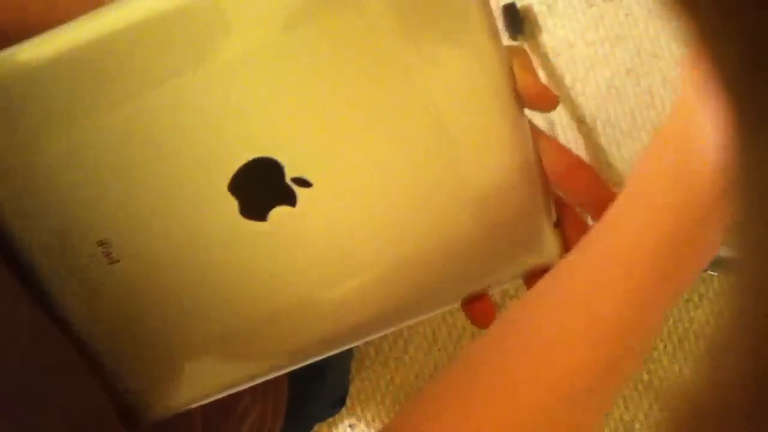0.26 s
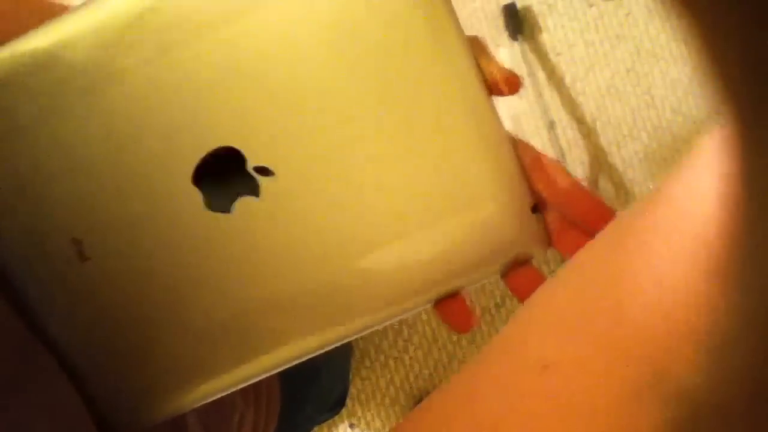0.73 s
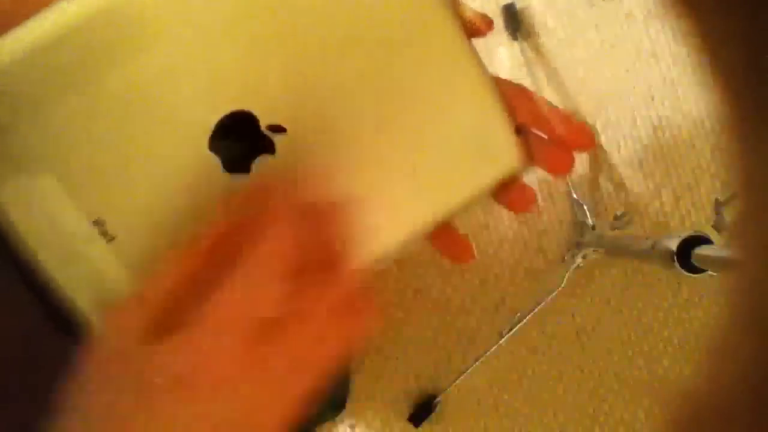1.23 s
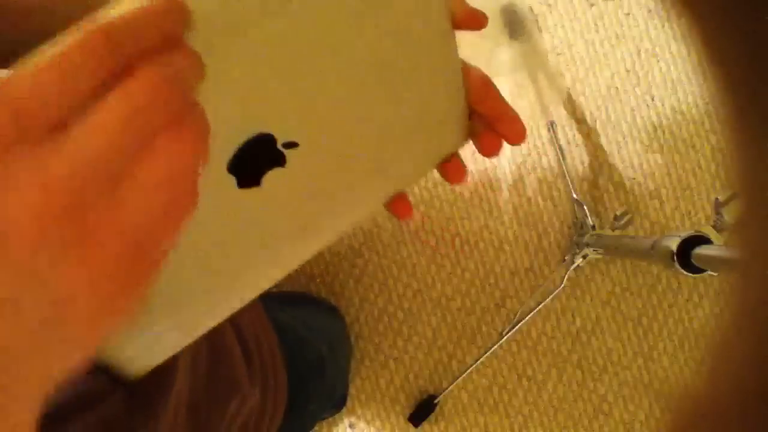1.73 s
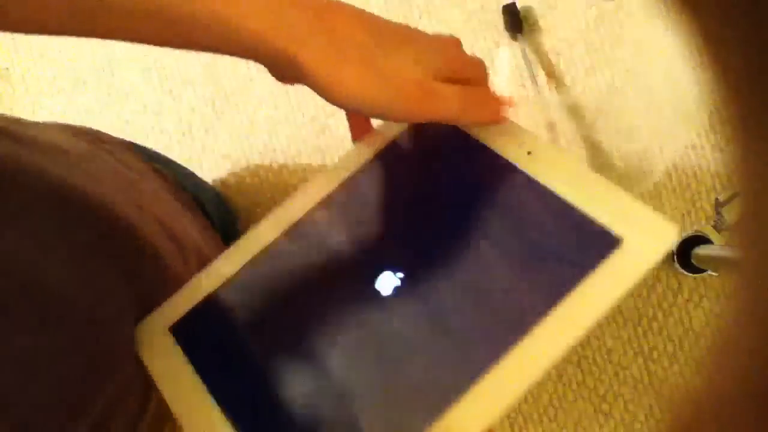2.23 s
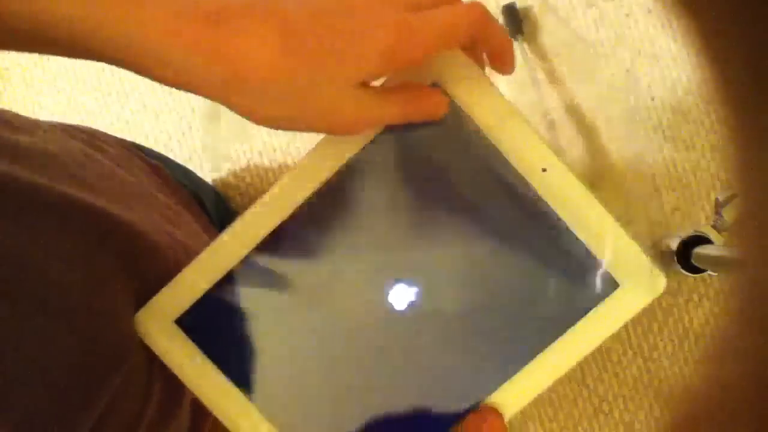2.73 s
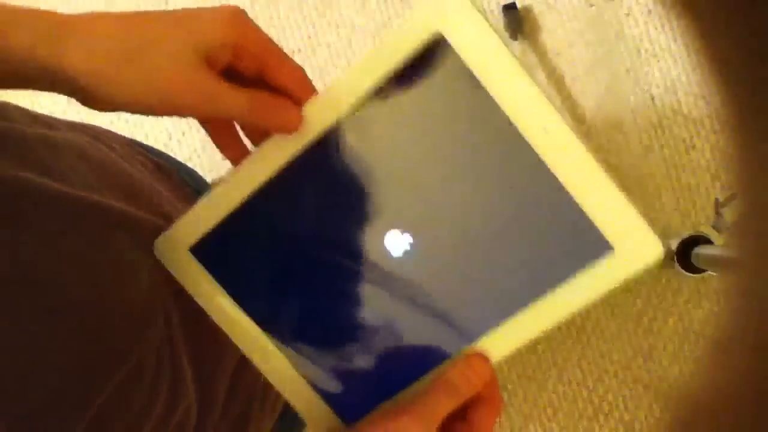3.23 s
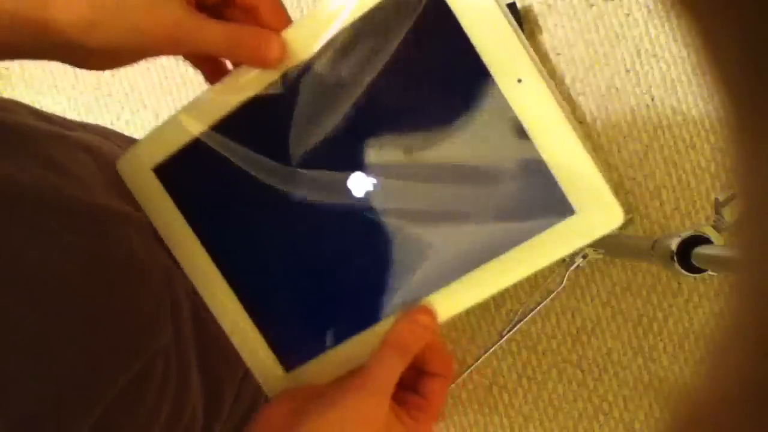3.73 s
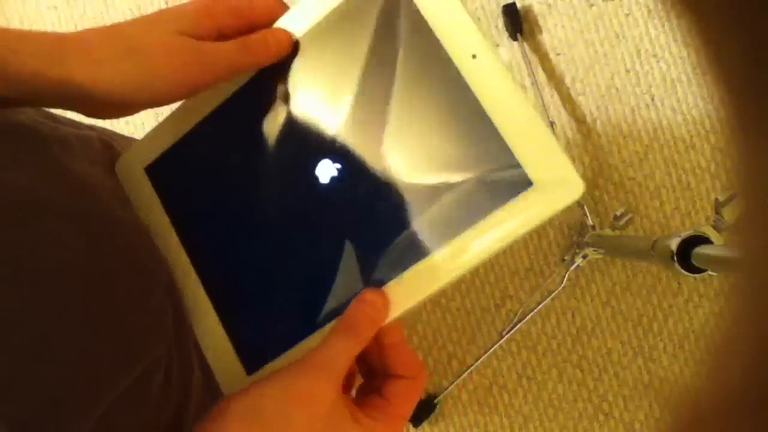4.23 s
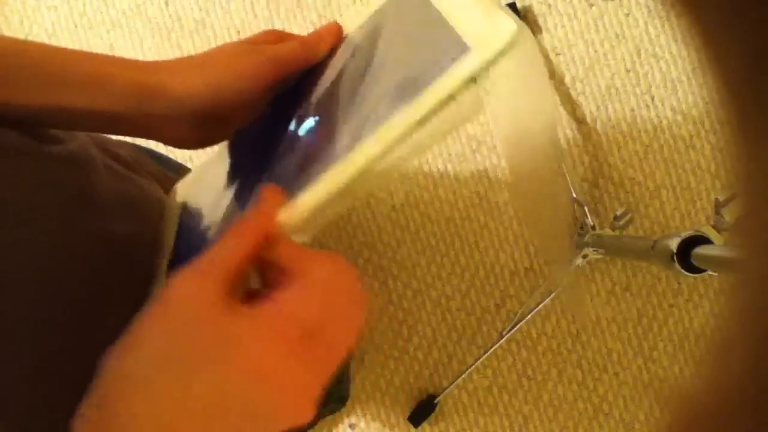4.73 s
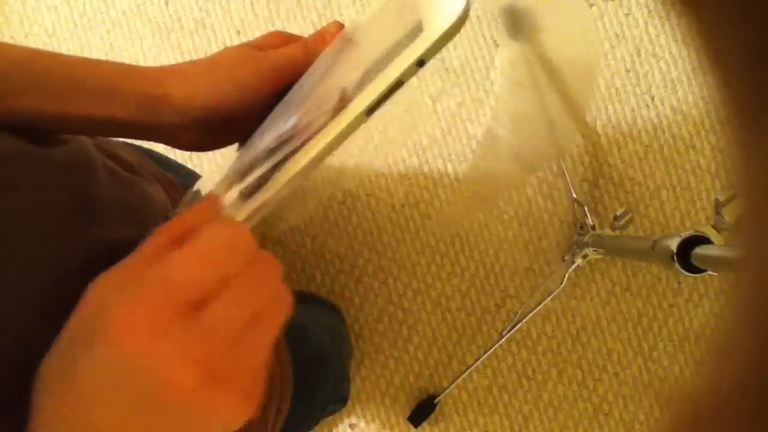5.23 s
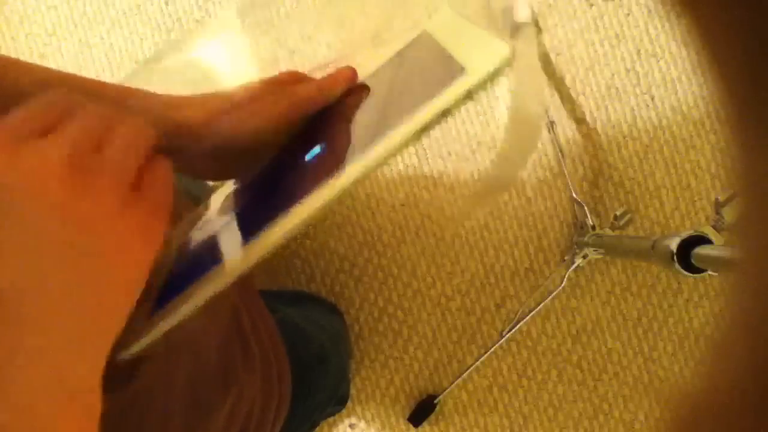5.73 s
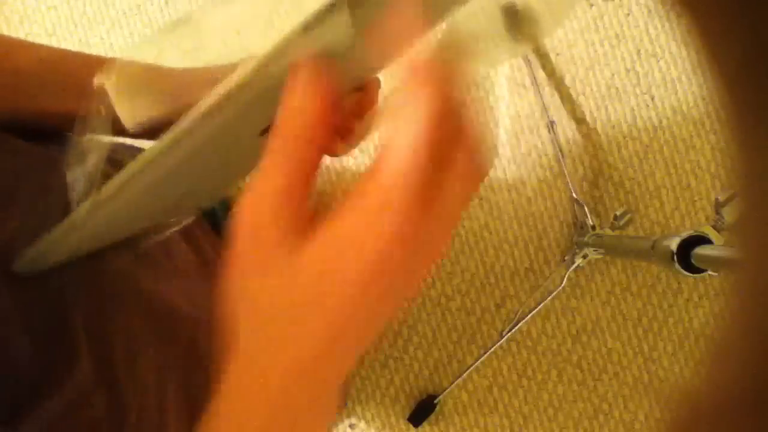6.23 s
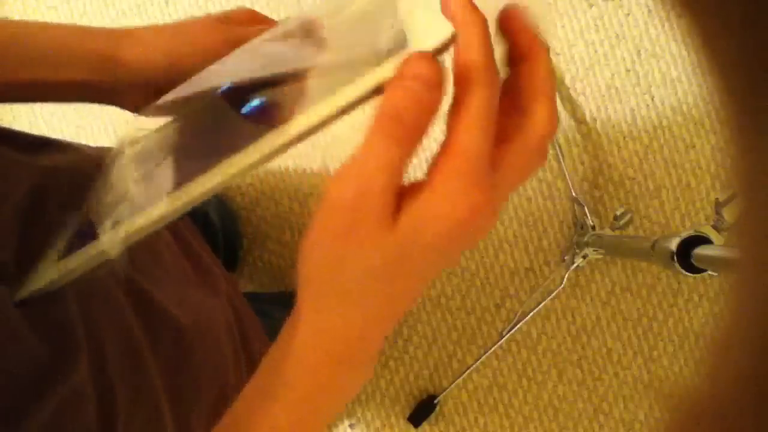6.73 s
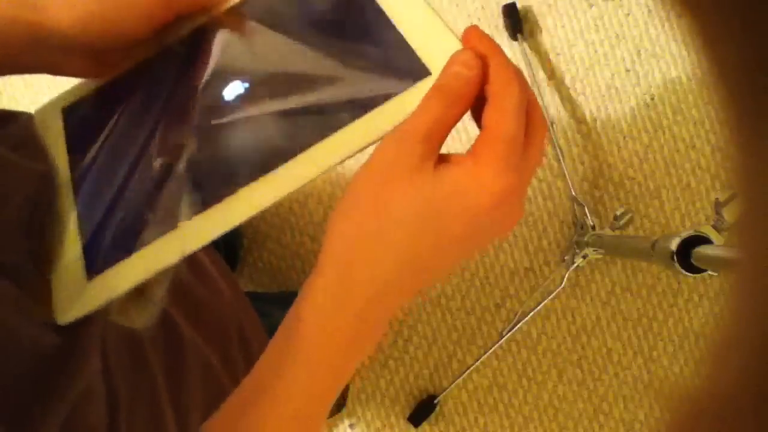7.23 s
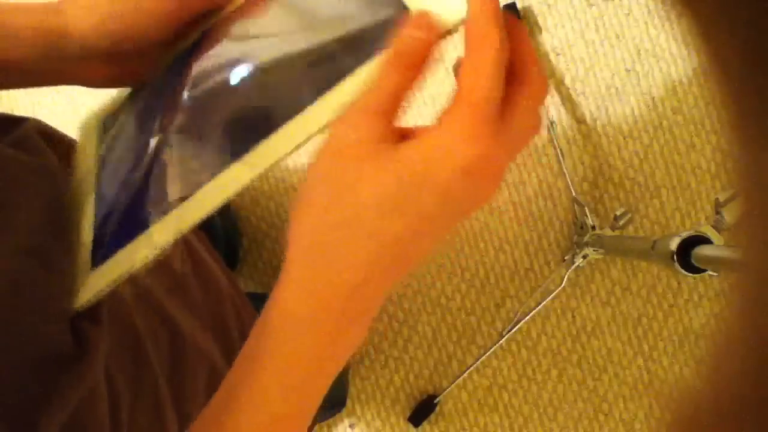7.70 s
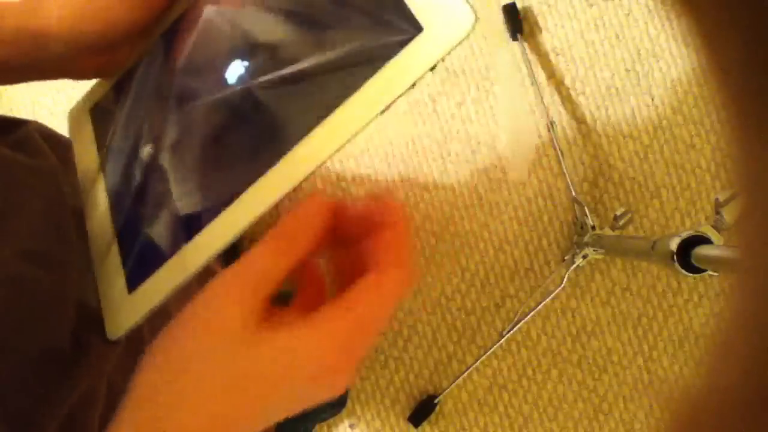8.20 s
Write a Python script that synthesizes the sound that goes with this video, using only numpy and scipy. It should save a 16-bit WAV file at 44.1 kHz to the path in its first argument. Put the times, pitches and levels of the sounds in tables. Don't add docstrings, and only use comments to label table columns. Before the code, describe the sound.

Thin stiff plastic film peeled off a flat slab up close, sharp irregular snaps and fine crackles with soft finger bumps in a quiet room.

```python
import sys
import numpy as np
from scipy import signal
from scipy.fft import rfft, irfft
from scipy.io import wavfile

SR = 44100
rng = np.random.default_rng(int(sys.argv[2]) if len(sys.argv) > 2 else 0)


def pcm_store(signal):
    levels = np.round(np.clip(np.atleast_2d(signal), -1, 1) * 32767)
    wavfile.write(sys.argv[1], SR, levels.astype(np.int16).T)


def gain_from_decibels(decibels):
    exponent = np.asarray(decibels, float) / 20
    return 10 ** exponent


N = 373086


def rms_one(x):
    return x / np.sqrt(np.mean(x ** 2) + 1e-20)


def top_one(shapes):
    return shapes / np.abs(shapes).max(axis=1, keepdims=True)


def band(x, low_hz, high_hz):
    edges_hz = [low_hz, min(high_hz, 0.45 * SR)]
    return signal.sosfilt(signal.butter(2, edges_hz, "band", fs=SR, output="sos"), x)


def at_hz(points, hz):
    points = np.array(points)
    return np.interp(np.log(hz + 1), np.log(points[:, 0]), points[:, 1])


def colour(x, spectrum):
    hz = np.fft.rfftfreq(len(x), 1 / SR)
    return rms_one(irfft(rfft(x) * gain_from_decibels(at_hz(spectrum, hz)), len(x)))


def drift(per_s):
    knots = rng.standard_normal(400)
    return np.interp(np.arange(N) / SR * per_s, np.arange(len(knots)), knots)


def place(times, shapes):
    out = np.zeros(N + shapes.shape[1])
    at = (np.asarray(times) * SR).astype(int)[:, None] + np.arange(shapes.shape[1])
    np.add.at(out, at, shapes)
    return out[:N]


def burst(t, rise_s, t60):
    return top_one((1 - np.exp(-t / rise_s)) ** 2 * gain_from_decibels(-60 * t / t60))


def gesture(t, crest_s, level_db, swell_s, fade_s):
    return gain_from_decibels(level_db - 20 * np.maximum((crest_s - t) / swell_s, (t - crest_s) / fade_s))


def creases():
    # start_s, peak_db, ring_hz (pitch), body_db
    # (below 2.2 kHz), edge_db (above 7 kHz)
    crease_flips = [(0.0037, -9.5, 4270, -21, -4.5), (0.0041, -13, 2660, -20, -24),
                    (0.0892, -32.5, 2410, -5.5, -25), (0.1773, -30.5, 3700, -14, -8),
                    (0.1951, -8, 4040, -36, -5), (0.1999, -9, 3320, -40, -4), (0.2112, -15.5, 5150, -20, -26),
                    (0.2139, -28, 3150, -27, -23), (0.3649, -7.5, 4800, -38, -3.5),
                    (0.5111, -3, 4850, -36, -9.5), (0.5146, -12, 5000, -50, -11),
                    (0.5478, -11, 4730, -32, -1), (0.5518, -8.5, 4400, -25, -5),
                    (0.5601, -13, 4120, -30, -31), (0.5627, -15.5, 4830, -21, -28),
                    (0.5992, -19, 3640, -23, -31), (0.6375, -25, 2670, -14, -25),
                    (0.6429, -19, 2410, -25, -14), (0.647, -26, 4000, -25, -18),
                    (0.6524, -30, 2780, -11, -28), (0.8102, -26, 4170, -23, -14),
                    (1.1557, -47.5, 1270, 0, -23), (1.6249, -15, 2840, -20.5, -23.5),
                    (1.7856, -26, 5300, -43, -14), (1.8521, -30, 4670, -17.5, -14),
                    (2.0177, -14, 3230, -21.5, -17), (2.0536, -30, 5210, -11, -26),
                    (2.0809, -8.5, 4530, -22, -14.5), (2.1559, -38, 5600, -17, 1),
                    (2.1713, -24, 5000, -18, -7), (2.2384, -15.5, 2760, -31, -13),
                    (2.2401, -8, 4660, -47, -11.5), (2.246, -27, 3920, -31, -9),
                    (2.2618, -3, 4450, -25, -7.5), (2.2922, -26.5, 4780, -24, -1),
                    (2.3136, -30, 4000, -30, -5), (2.4444, -24, 4830, -21.5, -11),
                    (2.6966, -29.5, 3900, -15, -22), (2.8975, -17, 4330, -38.5, -11.5),
                  (2.9096, -23.5, 5270, -15, -21), (2.912, -19.5, 4700, -13, -31),
                  (2.925, -14.5, 3370, -16, -43), (2.9866, -19, 3750, -19, -18),
                  (2.9936, -28, 3620, -19, -22), (3.141, -31, 4600, -30, -18),
                  (3.1691, -21, 2670, -12, -17), (3.1803, -22, 5060, -17, -10),
                  (3.4825, -34, 3920, -31, -23), (3.53, -41, 5000, -27, -9),
                  (3.5686, -19.5, 1570, -9.5, -7), (3.5895, -33, 3920, -28, -6),
                  (3.605, -14, 4930, -46, -10.5), (3.6125, -14.5, 4970, -48, -3),
                  (3.6281, -5.5, 4800, -46, -20), (3.6335, -24, 4690, -26, -17),
                  (3.6543, -11, 4840, -43, -7.5), (3.6592, -28, 4940, -36, 2), (3.662, -14, 4600, -26, -22),
                  (3.6797, -27, 4480, -44, -23), (3.6979, -22, 4900, -52, -3),
                  (3.763, -38.5, 3230, -27, -30), (3.831, -8, 4120, -52, -5), (3.8362, -1, 5700, -54, -22),
                  (3.843, -32, 5170, -47, -19), (3.85, -12, 4650, -43, -25), (3.8538, -15, 4960, -43, -22),
                  (3.868, -21.5, 4610, -31.5, -20), (3.9248, -31, 3920, -26, -7),
                    (4.1915, -38, 3490, -16, -16), (4.213, -30, 4400, -23, -21),
                  (4.2395, -36, 4910, -25, -11), (4.2606, -32, 3530, -22, -19),
                  (4.2722, -35, 4870, -22, -7), (4.2818, -33, 3620, -20, -11),
                  (4.2843, -40.5, 3300, -20, -26), (4.3532, -35, 4870, -21, -9),
                  (4.435, -28, 4130, -17, -14), (4.4575, -34, 4950, -22, -6), (4.4638, -35, 3010, -14, -8),
                  (4.474, -16.5, 4150, -33, -11.5), (4.4966, -31.5, 4300, -17, -4),
                  (4.5557, -4.5, 4960, -50, -15.5), (4.605, -11.5, 5270, -43, -7),
                  (4.6083, -27, 5000, -36, -7), (4.6161, -5.5, 4706, -46, -7.5),
                  (4.6218, -18, 3560, -27, -7), (4.6329, -15.5, 4400, -28, -23),
                  (4.6726, -13, 4220, -35, -17), (4.6777, -34, 4690, -28, -40),
                  (4.6895, -5.5, 4780, -54, -18), (4.6925, -20.5, 4640, -41, -4.5),
                  (4.6945, -18, 4780, -46, -24), (4.939, -19, 5650, -57, -1), (4.946, -26, 5770, -46, -4),
                  (5.1283, -22, 5100, -27, -14), (5.177, -31, 3960, -22, -33),
                  (5.1815, -21, 4470, -22, -39), (5.216, -5.5, 4220, -26.5, -13.5),
                  (5.2303, -25, 3920, -42, -35), (5.2698, -21, 4850, -22, 1.5),
                  (5.2741, -22.5, 4480, -33, -4), (5.3092, -24, 3660, -33, -40),
                  (5.3187, -4.5, 3930, -19, -4.5), (5.3245, -10, 3170, -27, -10),
                  (5.3332, -12, 4900, -34, -7), (5.368, -3.5, 5000, -28, -19),
                  (5.373, -12.5, 2820, -25, -14), (5.3783, -18, 6240, -21, -16),
                    (5.3815, -19, 4500, -33, -13), (5.3899, -13.5, 4570, -24, -9),
                  (5.401, -19, 3060, -21, -6), (5.4142, -20, 3360, -29, -4), (5.441, -28, 5210, -18, -19),
                  (5.443, -16, 4000, -30, -8), (5.458, -11.5, 4050, -30, -16),
                  (5.461, -10.5, 4170, -28, -14), (5.4653, -16.5, 4690, -27, -20),
                  (5.483, -17.5, 3620, -20, -15), (5.5139, -23, 3200, -20, -17),
                  (5.519, -6.5, 4330, -25.5, -24), (5.5357, -10.5, 3960, -22, -13),
                  (5.6035, -31.5, 3920, -16, -15), (5.6513, -24, 2410, -15, -29),
                  (5.7145, -23, 3960, -21, -35), (5.727, -25.5, 1940, -11.5, -12),
                  (5.737, -23.5, 4140, -13.5, -30), (5.7711, -32, 3660, -23, 0),
                  (5.79, -32, 1220, -5.5, -17), (5.81, -22.5, 3340, -20, -17),
                  (5.8989, -24, 2900, -28, -17), (5.9337, -27, 3140, -13, -8),
                  (5.9587, -22, 2900, -22, -40), (5.9674, -20, 4500, -25, -11), (6.034, -26, 3280, -17, -6),
                  (6.2022, -27.5, 5650, -26, -14), (6.2532, -29, 5760, -44, -16),
                  (6.311, -34.5, 4740, -15, -27), (6.346, -9, 4220, -25.5, -16),
                  (6.35, -6.5, 4280, -41, -10.5), (6.3556, -22, 3100, -23, -19),
                  (6.3599, -28, 4610, -41, -16), (6.3803, -7, 4600, -48, -25), (6.44, -22, 4550, -20, -26),
                  (6.4854, -29.5, 5400, -15, -12), (6.5693, -27, 2730, -26, -18),
                  (6.8161, -16.5, 5230, -27, -16), (6.847, -23, 4370, -29, -13),
                    (6.879, -27.5, 4480, -17, -31), (6.899, -32, 4520, -20, -13),
                    (6.933, -33.5, 3620, -29, -9), (7.033, -22, 3940, -23, -16),
                    (7.0554, -21, 3800, -22, -27), (7.062, -20, 3830, -12.5, -8.5),
                    (7.0658, -27, 3700, -18, -17), (7.091, -26, 3960, -27, -9),
                    (7.1074, -12.5, 4970, -28, -14.5), (7.139, -6.5, 4920, -27.5, -18),
                    (7.1745, -22.5, 3750, -14, -30), (7.1771, -19.5, 4260, -28, -30),
                    (7.223, -32, 4600, -32, -6), (7.2466, -33, 4540, -40, -12),
                    (7.318, -19.5, 4320, -33, -6.5), (7.3772, -18, 5000, -36, -14),
                    (7.3982, -28, 5130, -30, -18), (7.414, -27, 3060, -28, -16),
                    (7.4219, -22, 3640, -17.5, -14), (7.4333, -19.5, 4020, -21, -10),
                    (7.446, -29, 4100, -33, 3), (7.4811, -25.5, 3860, -30, -32),
                    (7.5218, -32.5, 4780, -19, -24), (7.5798, -31, 4100, -12, -11),
                    (7.6063, -15, 4280, -33, -16), (7.7047, -27, 4230, -29, -10),
                    (7.7526, -28, 3320, -26, -14), (7.9788, -23.5, 4700, -18, -30),
                    (8.0097, -15.5, 3870, -55, -15), (8.012, -20, 5300, -44, -12),
                    (8.0232, -26.5, 3750, -47, -29), (8.0598, -21.5, 3250, -15.5, -25),
                    (8.123, -4.5, 3750, -50, -34), (8.136, -23, 4200, -45, -42),
                    (8.2511, -32, 3200, -46, -2), (8.3478, -35, 3760, -17.5, -41),
                    (1.0673, -40.5, 5000, -18, -29), (1.9124, -55.5, 4350, -22, 6), (2.889, -28, 5000, -23, -11),
              (3.028, -30, 3300, -16, -26), (3.3162, -39.5, 5000, -19, -5.5),
              (3.8158, -30.5, 3400, -35, -25), (5.9055, -26, 3080, -19, -26),
              (6.0406, -29, 2100, -8.5, -25), (6.6199, -34.5, 4050, -13, -29),
              (6.7968, -32, 3450, -23, -13), (7.3541, -42.5, 4300, -37, -2), (8.1956, -45, 1800, -11, -30),
              (8.313, -46.5, 1500, -7, -27)]
    rows = np.array(crease_flips)
    lag_s, peak_boost_db, body_boost_db, edge_boost_db = 0.0006, 1.5, 12.5, 4.5
    return rows + [lag_s, peak_boost_db, 0, body_boost_db, edge_boost_db]


def snaps(flips):
    start_s, peak_db, hz, body_db, edge_db = np.transpose(flips)[:, :, None]
    t = np.arange(512)[None] / SR
    luck = rng.random((len(start_s), 2))
    noise = rng.standard_normal((len(start_s), t.size))

    ring = np.sin(2 * np.pi * (np.maximum(hz, 2600) * t + luck[:, :1])) * burst(t, 0.000098, 10.0 / hz)
    crack = top_one(band(noise * burst(t, 0.00015, 0.0025), 2500, 7000))
    main = top_one(band(ring + 0.52 * crack, 2590, 6410))

    overtone = np.sin(2 * np.pi * 1.992 * np.maximum(hz, 4000) * t)
    edge = (noise + 0.37 * overtone) * burst(t, 0.0001, 0.0049)
    edge = top_one(band(edge, 7070, 11720))

    body_hz = np.minimum(hz, 1500 + 600 * luck[:, 1:])
    body_t60 = 0.0042 * np.maximum(3300 / hz, 1) ** 0.15
    body = np.sin(2 * np.pi * body_hz * t) * burst(t, 0.000081, body_t60)
    body = top_one(band(body, 310, 4400))
    return place(start_s[:, 0], gain_from_decibels(peak_db) * (main + gain_from_decibels(edge_db) * edge + gain_from_decibels(body_db - 2.5) * body))


def handling(flips):
    # crest_s, crackle_db, swell_s, fade_s, flap_db (flapping relative to crackle)
    rustles = [(0.558, -27, 0.014, 0.021, -31), (0.645, -31.5, 0.02, 0.082, -1),
               (0.701, -41, 0.15, 0.0061, 12.5), (.863, -54, 0.43, 0.15, 4.5),
               (2.035, -38.5, 0.061, 0.12, -23), (2.16, -42.5, 0.073, 0.094, 4.5),
               (2.236, -53, 0.011, 0.063, -19), (2.43, -52.5, 0.92, 0.054, -6),
               (2.689, -45.5, 0.21, 0.029, -3.5), (2.928, -27, 0.034, 0.047, 1.5),
               (3.186, -35, 0.069, 0.077, -2), (3.48, -45.5, 0.14, .15, -4),
               (3.662, -45, 0.099, 0.038, 4.5), (4.494, -39, 0.11, 0.13, -32),
               (4.79, -57.5, 0.076, 0.072, 2), (5.333, -31, 0.049, 0.12, -22), (5.392, -30, 0.05, 0.21, -6),
               (5.732, -48, 0.062, 0.4, 0), (5.917, -46, 0.052, 0.5, 3.5), (6.04, -41, 0.04, 0.046, -15),
               (6.359, -25.5, 0.015, 0.076, -38), (6.894, -48.5, 0.24, 0.063, 0),
               (7.149, -39, 0.19, 0.089, -21), (7.428, -42, 0.085, 0.13, -32)]
    # time_s, level_db
    grip = [(0, -40), (.5, -108), (1.0, -76.5), (1.2, -62.5), (1.8, -53), (1.99, -78), (2.87, -79),
            (3.3, -85), (3.8, -55.5), (4.05, -55), (4.33, -53.5), (4.92, -108), (5.15, -62), (6.2, -53.5),
            (6.86, -66.5), (7.9, -57.5), (8.1, -46.5), (8.45, -91)]
    t = np.arange(0, N + 128, 128) / SR

    rows = [(*row, -6.5 - 0.1548 * (row[1] + 50)) for row in rustles]
    strength, own_colour = 0.61, 0.54
    for start_s, peak_db, _, body_db, edge_db in flips:
        wake_db = strength * peak_db - 31.5
        wake_flap_db = 3.5 + own_colour * body_db
        rows.append((start_s, wake_db, 0.003, 0.061, wake_flap_db, own_colour * edge_db))

    crest_s, level_db, swell_s, fade_s, flap_db, bright_db = np.transpose(rows)[:, :, None]
    each = gesture(t, crest_s, level_db, swell_s, fade_s) ** 2
    bed = gain_from_decibels(2 * np.interp(t, *np.transpose(grip)))

    def total_db(bed_db, each_db):
        power = bed * gain_from_decibels(2 * bed_db) + (each * gain_from_decibels(2 * each_db)).sum(axis=0)
        return np.interp(np.arange(N) / SR, t, 10 * np.log10(power))

    level = total_db(0, 0)
    bright = total_db(-6.5, bright_db)
    flap = total_db(-8, flap_db)
    return level, bright - level, flap


def crackle(level_db, bright_db):
    # pitch_hz, level_db (per Hz)
    crackle_spectrum = [(500, 1), (1000, -16.5), (2000, -0.5), (3300, 5), (5000, 6), (6300, -3.5),
                        (9000, -2), (12000, -11.5), (16000, -9)]
    per_s = 1200 * gain_from_decibels(0.3 * (level_db + 61.0) + 5.2 * drift(40))
    sizes = gain_from_decibels(2.3 * np.minimum(rng.exponential(1, N), 3.5)) * rng.choice([-1, 1], N)
    flips = sizes * (rng.random(N) < per_s / SR) / gain_from_decibels(0.096 * (level_db + 60))

    dealt = rng.integers(0, 16, N)
    out = 0.037 * rng.standard_normal(N)
    for k, hz in enumerate(np.geomspace(1000, 12000, 16)):
        r = np.exp(-np.pi * hz / 1.5 / SR)
        w = 2 * np.pi * hz / SR
        patch = gain_from_decibels(2.5 * drift(8.1))
        struck = flips * (dealt == k) + 1e-18
        out += patch * signal.lfilter([1 - r, 0, r - 1], [1, -2 * r * np.cos(w), r * r], struck)

    spectrum = rfft(colour(out, crackle_spectrum))
    treble = irfft(spectrum * np.clip(np.fft.rfftfreq(N, 1 / SR) / 1500 - 4, 0, 1), N)
    return gain_from_decibels(level_db) * (irfft(spectrum, N) + (gain_from_decibels(bright_db + 6.0) - 1) * treble)


def flapping(level_db):
    # pitch_hz, level_db (per Hz)
    flap_spectrum = [(60, -9), (200, -9.5), (500, 0.5), (1200, -1.5), (2200, -1.5), (5000, -24.5)]
    return gain_from_decibels(level_db + 3.5 * drift(45)) * colour(rng.standard_normal(N), flap_spectrum)


def sliding():
    # crest_s, level_db, swell_s, fade_s, low_db (low fold relative to high)
    slides = [
        (1.56, -56, 0.45, 0.43, -1),
        (2.66, -63, 0.17, 0.077, -19),
        (3.18, -45.5, 0.26, 0.16, -5.5),
        (3.47, -51, 0.21, 0.26, -10),
        (4.1, -71, 0.26, .3, -2),
        (6.54, -61.5, 0.092, 0.13, 3),
        (6.72, -65, 0.23, 0.11, 7.5),
    ]
    t = np.arange(N) / SR
    white = rng.standard_normal((3, N))
    crest_s, level_db, swell_s, fade_s, low_db = np.transpose(slides)[:, :, None]
    each = gesture(t, crest_s, level_db, swell_s, fade_s)

    high = rms_one(band(white[0], 4350, 5650))
    high = high + gain_from_decibels(-4.5) * rms_one(band(white[1], 7000, 12800))
    low = gain_from_decibels(1.5 * drift(30)) * rms_one(band(white[2], 1575, 2505))
    roughness = gain_from_decibels(5.0 * drift(45) + 1.9 * drift(15))
    return roughness * high * each.sum(axis=0) + low * (each * gain_from_decibels(low_db)).sum(axis=0)


def bumps():
    # start_s, peak_db, ring_hz (pitch), t60_s (time to die away)
    contacts = [(0.192, -29.5, 451, 0.049), (0.361, -28.5, 478, 0.021), (0.514, -26, 514, 0.025),
                (0.545, -26, 644, 0.082), (0.64, -19, 284, 0.034), (0.844, -39, 380, 0.09),
                (0.96, -43, 287, 0.1), (2.076, -36.5, 386, 0.079), (2.257, -37.5, 508, 0.12),
                (2.696, -36, 267, 0.065), (2.91, -30, 562, 0.044), (3.162, -37, 488, 0.067),
                (3.44, -34, 252, 0.038), (3.562, -41, 585, 0.062), (3.818, -42.5, 697, 0.023),
                (3.853, -35.5, 500, 0.078), (4.47, -30.5, 497, 0.034), (4.773, -36, 563, 0.15),
                (5.315, -34.5, 855, 0.06), (5.367, -29.5, 520, 0.044), (5.477, -38, 574, 0.21),
                (5.651, -38, 284, 0.043), (5.79, -40, 1490, 0.1), (5.899, -34, 1124, 0.1),
                (7.416, -52, 566, 0.046)]
    start_s, peak_db, hz, t60 = np.transpose(contacts)[:, :, None]
    t = np.arange(4096)[None] / SR
    ring = 0.5 * np.maximum(hz / 700, 1) ** 0.86 * np.sin(2 * np.pi * hz * t)
    puff = band(rng.standard_normal((len(start_s), t.size)), 110, 1140)
    puff_share = 2.95 * np.clip(np.minimum(hz, 1400 - hz), 60, 900) / 600
    shapes = (ring + puff_share * puff) * burst(t, 0.0024, np.clip(t60, 0.01, 0.3))
    return place(start_s[:, 0], gain_from_decibels(peak_db - 4.0) * shapes)


def room(x):
    # delay_s, level_db
    echoes = [
        (.0058, -27),
        (.0088, -31.5),
        (0.013, -24.5),
    ]
    # pitch_hz, t60_s (time to fall 60 dB)
    tail_t60 = [(300, 0.38), (1000, 0.13), (4000, 0.17), (12000, 0.048)]
    t = np.arange(int(0.4 * SR)) / SR
    white, tails = rng.standard_normal((8, len(t))), 0
    for low_hz in 125 * 2.0 ** np.arange(7):
        fall = gain_from_decibels(-60 * t / at_hz(tail_t60, low_hz * np.sqrt(2)))
        tails = tails + band(white, low_hz, 2 * low_hz) * fall

    responses = gain_from_decibels(-32.0) * tails * np.clip((t - 0.003) / 0.00022, 0, 1)
    for delay_s, level_db in echoes:
        responses[:, int(delay_s * SR)] += gain_from_decibels(level_db)
    spot = np.arange(N) // 1500 % len(responses)
    return sum(signal.fftconvolve(x * (spot == k), response)[:N] for k, response in enumerate(responses))


def gain_control():
    # time_s, depth_db
    turned_down = [
        (.55, -9),
        (.98, -4.5),
        (2.76, -2),
        (4.65, -8),
        (5.0, -1),
        (5.35, -10),
        (7.2, -8.5),
        (8.16, -16),
    ]
    top_db, drop_db_per_s, recover_db_per_s = 2.5, 67, 8.5
    t = np.arange(N) / SR
    ducks = [depth_db + np.maximum(drop_db_per_s * (time_s - t), recover_db_per_s * (t - time_s))
             for time_s, depth_db in turned_down]
    return top_db + np.minimum(np.min(ducks, axis=0), 0)


def room_noise():
    # pitch_hz, level_db (per Hz)
    noise_spectrum = [(25, -31), (75, -0.5), (200, 0), (900, -10), (2000, -12), (5000, -11.5), (7000, -15),
                      (13500, -17), (16500, -35)]
    return gain_from_decibels(-58.5) * colour(rng.standard_normal(N), noise_spectrum)


def whine():
    return gain_from_decibels(-66.5) * np.sin(2 * np.pi * 14992 * np.arange(N) / SR)


def scene():
    flips = creases()
    crackle_db, bright_db, flap_db = handling(flips)
    film = snaps(flips) + crackle(crackle_db - 0.5, bright_db) + flapping(flap_db - 8.0)
    near = film + sliding() + bumps()
    background = gain_from_decibels(gain_control()) * (room_noise() + whine())
    return (near + room(near) + background)[None]


def band_limit(x):
    return signal.sosfilt(signal.butter(12, 16970, fs=SR, output="sos"), x)


def record(dry):
    rounded = 0.7 * np.tanh(dry / 0.7)
    top_cut = signal.cheby2(10, 60, 17200, fs=SR, output="sos")
    mix = signal.sosfilt(top_cut, rounded)
    return band_limit(mix)


dry = scene()
out = record(dry)
pcm_store(out)
```